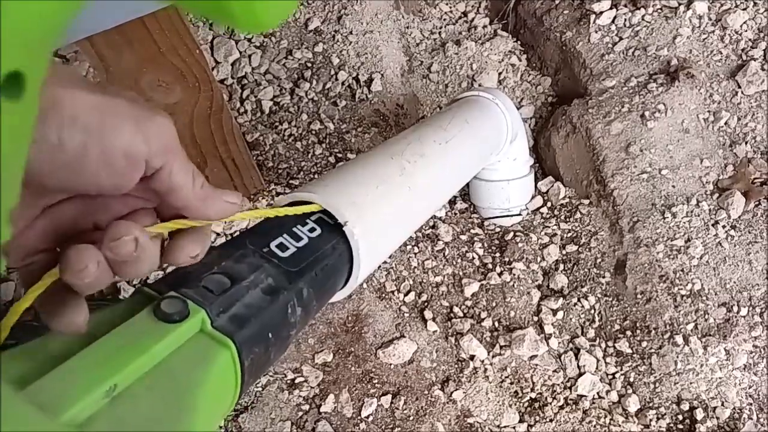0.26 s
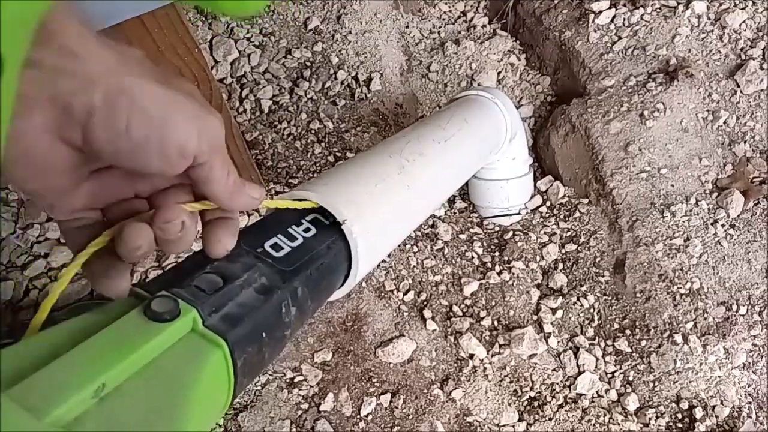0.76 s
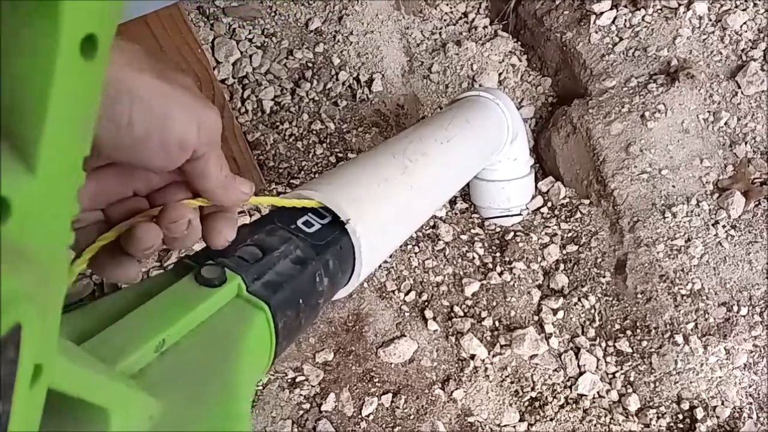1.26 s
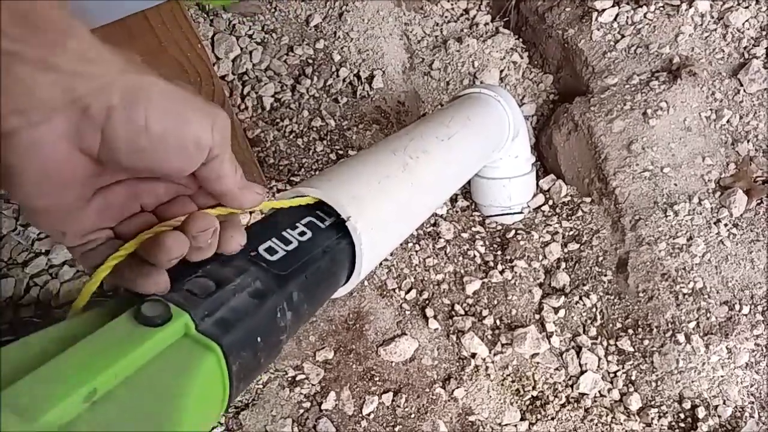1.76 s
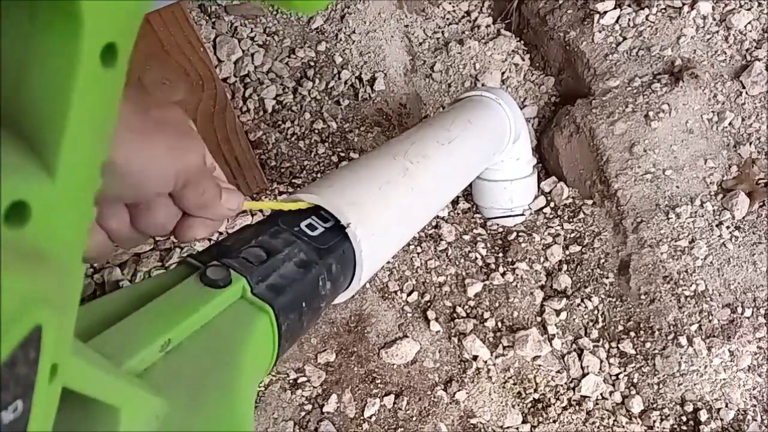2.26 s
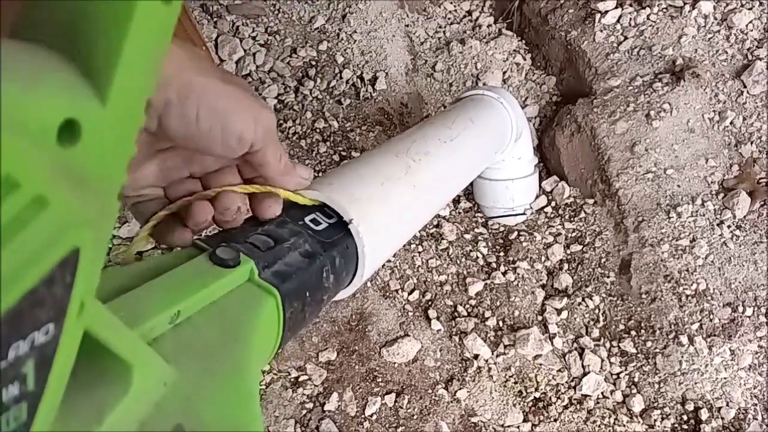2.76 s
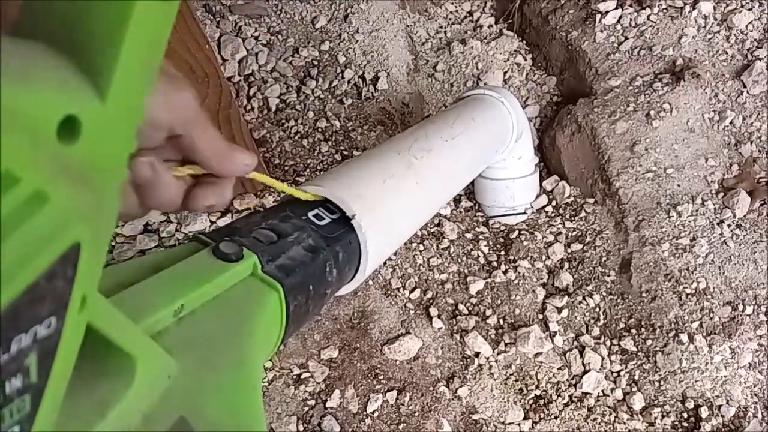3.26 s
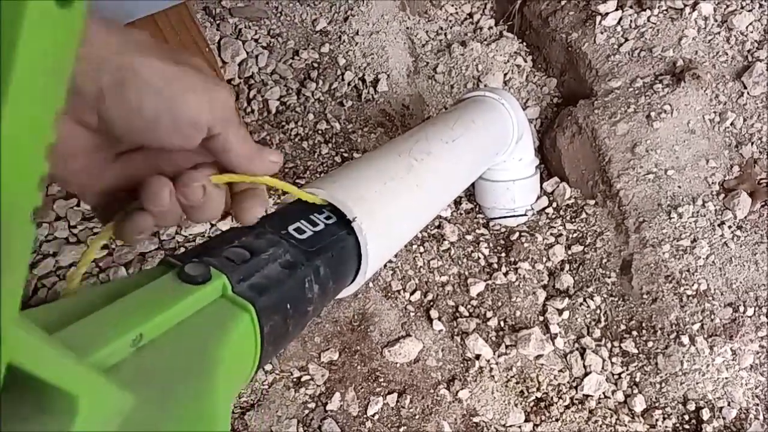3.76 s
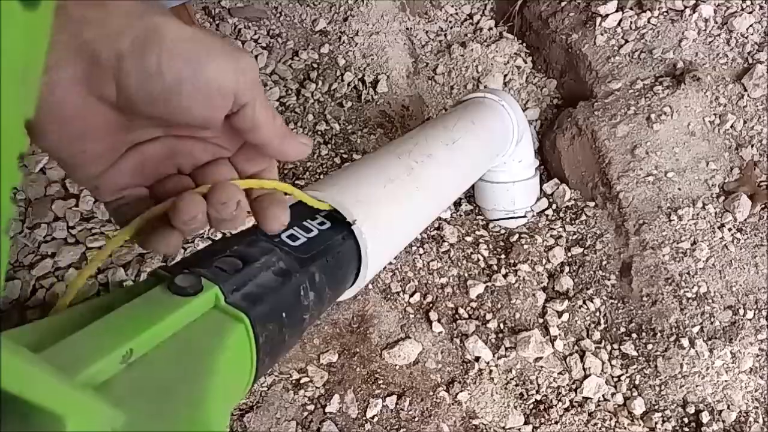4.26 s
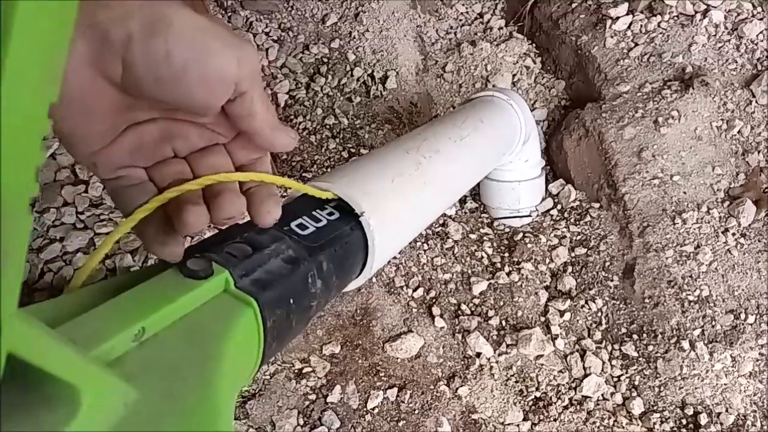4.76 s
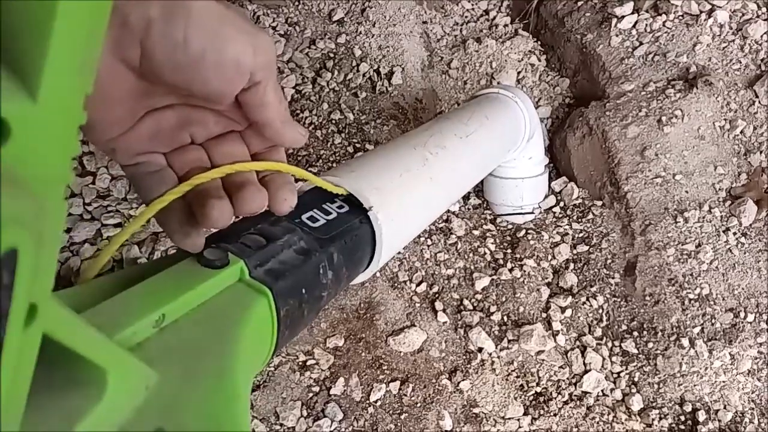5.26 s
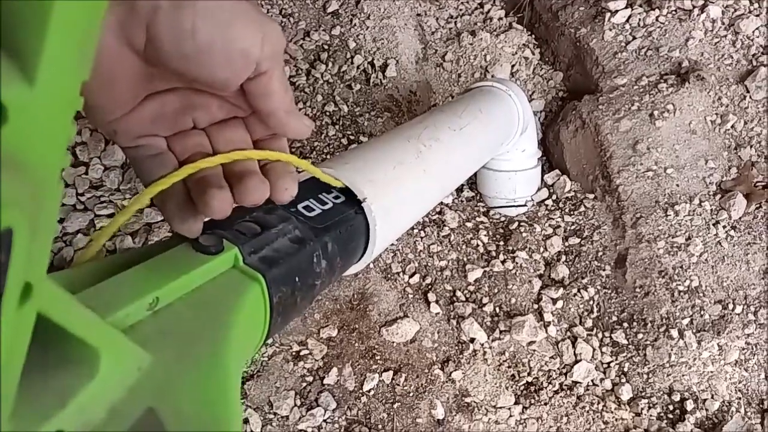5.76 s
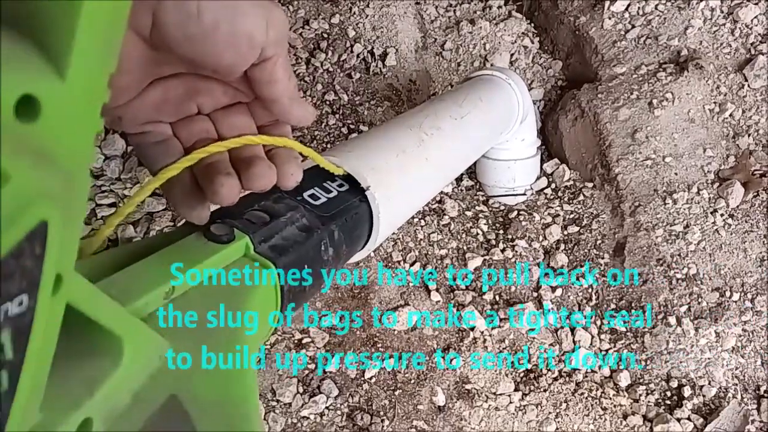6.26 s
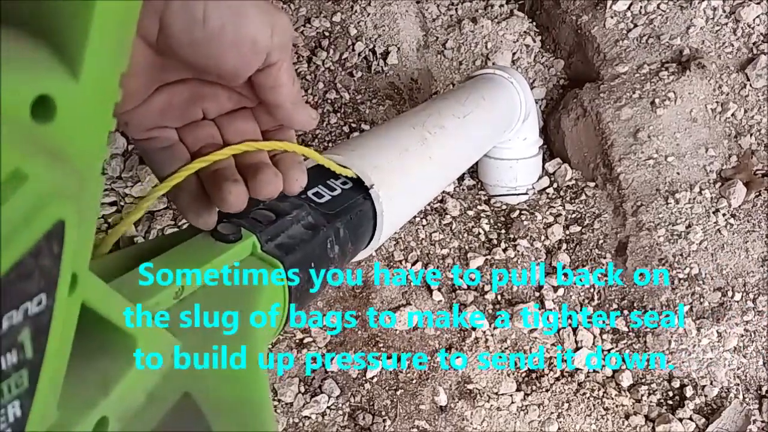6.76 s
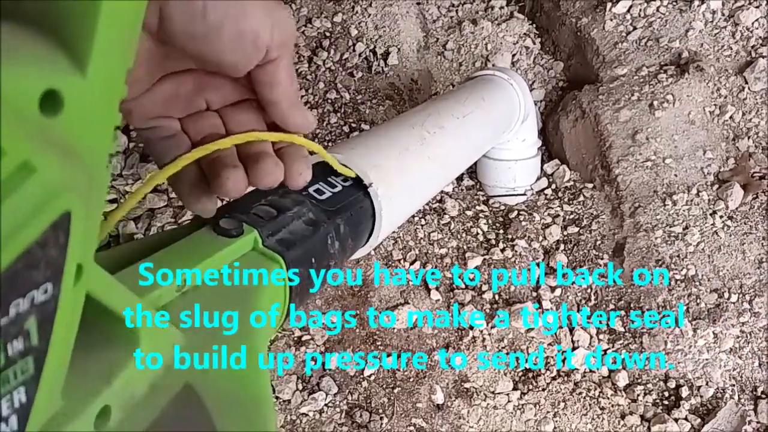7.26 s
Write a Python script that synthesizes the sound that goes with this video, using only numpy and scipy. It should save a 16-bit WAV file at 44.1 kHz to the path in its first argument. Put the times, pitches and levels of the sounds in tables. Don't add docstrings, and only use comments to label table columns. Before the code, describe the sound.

An electric leaf blower runs without pause, blowing into a white plastic pipe outdoors. Broad rushing hiss dominates, with a buzzy motor and fan whine beneath. The nozzle eases off twice early, changing the hiss; then the whine strengthens and chirps as pressure builds. After reseating, a lower airy whistle leaks around the seam, with soft hollow bumps. Very close small camera microphone, left side much louder and brighter.

```python
import sys
import numpy as np
from scipy import signal
from scipy.io import wavfile
from scipy.ndimage import uniform_filter1d

SR = 44100
rng = np.random.default_rng(int(sys.argv[2]) if len(sys.argv) > 2 else 0)


def linear_from_db(decibels):
    return 10 ** (np.asarray(decibels, float) / 20)


def generate_wav(sig):
    pcm = np.round(np.clip(np.atleast_2d(sig).T, -1, 1) * 32767).astype(np.int16)
    wavfile.write(sys.argv[1], SR, pcm)


N = 331089

# pitch_hz, left_db, right_db
HUM_LINES = [
    (121, -74.5, -84),
    (363.5, -84, -77),
    (610, -69, -76),
]
# freq_hz, density_db_per_hz (above -70)
RUSH_LEFT = [(25, -64.5), (90, -12.5), (160, -11), (350, -14), (800, -10.5), (1500, -9), (2050, -13),
             (2600, -6.5), (3450, -10.5), (4250, -12.5), (5800, -10), (9200, -15.5), (11500, -32),
             (15700, -40)]
# freq_hz, density_db_per_hz (above -70)
RUSH_RIGHT = [(25, -48), (110, -22.5), (350, -26.5), (700, -16), (1450, -16.5), (1750, -14), (2600, -11.5),
              (3100, -15), (3400, -41), (5300, -20), (6900, -30), (8000, -24.5), (11300, -42),
              (15700, -44.5)]
# centre_hz, width_hz, left_db, right_db
RESONANCES = [(245.3, 33, 9.5, 15.5), (613, 104, 3.5, -1.5), (1017, 59, 8.5, 1.5), (1345, 130, 7, 4),
              (1610, 60, 1, 4.5), (2310, 160, 0.5, -1.5), (2745, 134, 1, 1), (2910, 62, 3, 1.5),
              (3156, 205, 4.5, -6), (3675, 290, 4.5, 10), (4410, 90, 6.5, -6), (4580, 350, -1, -3),
              (6370, 170, 6, -13), (7287, 1480, 15.5, -15), (8900, 1310, 4.5, 10), (9330, 510, -5, -3.5)]
# freq_hz, likeness_0_1
PORT_LIKENESS = [(30, .25), (200, .92), (600, .84), (950, .68), (1300, .28), (1900, .25), (2650, .77),
                 (3150, .4), (3700, .65), (5300, .15), (5900, .3), (6600, .14), (15000, .07)]
# freq_hz, lag_rad
PORT_LAG = [(0, 0), (800, 3.1), (1100, 4.2), (1500, 7), (1900, 9), (2150, 6.3), (2900, 5.9), (3700, 8.1),
            (4400, 9.3), (5900, 10.1), (7000, 16), (9200, 21), (15000, 33)]
# centre_s, pitch_hz, level_db, length_s
EDGE_TONES = [(.05, 3050, -54, .12), (.3, 3080, -58, .1), (.3, 5420, -54, .08), (.52, 5120, -57, .12),
              (.66, 3060, -55, .08), (.8, 5400, -56, .1), (.92, 3110, -54.5, .16), (1.02, 4430, -56, .06),
              (1.25, 3640, -56, .06), (1.27, 3230, -54, .12), (1.7, 5010, -56, .12), (1.88, 5060, -62, .1),
              (2.5, 3190, -50, .12), (2.72, 3160, -49, .1), (2.8, 3230, -48.5, .08), (2.88, 4410, -51, .07),
              (3.03, 3230, -49.5, .12), (3.15, 4400, -48, .1), (3.3, 3080, -51, .1), (3.45, 3110, -58, .1),
              (3.97, 4420, -54, .08), (4.07, 1600, -57, .15), (4.5, 3700, -54, .1), (5.1, 2980, -53.5, .12),
              (5.22, 4410, -58.5, .1), (5.97, 4430, -54, .08), (6.3, 4430, -53.5, .14),
              (6.56, 4430, -53, .08), (7.12, 2450, -51.5, .08), (7.35, 4400, -57, .08)]
# time_s, speed_hz
ROTOR_SPEED = [(0, 241.1), (.3, 240.9), (1.0, 240.7), (1.3, 241.4), (1.55, 241.7), (1.8, 239.5),
               (2.05, 240.2), (2.45, 242.5), (3.4, 242.5), (3.8, 240.4), (4.65, 240.2), (5.45, 241.4),
               (6.0, 240.9), (6.5, 240.8), (7.5, 242.1)]
# multiple, left_over_rush_db, right_over_rush_db
ODD_ORDERS = [(2, 8.5, 4.5), (3, 5.5, 2), (10, 2, -3), (12, 0, 5), (13, -4, -6), (15, -1, -5), (30, 1, 0),
              (31, -4, -5), (32, 1, 1), (35, 2, 0), (36, 0, -1), (39, 5, 0), (41, 6, 4), (42, 7, 3),
              (49, 2, -1), (50, 2, 0), (59, 2, 0)]
# multiple, left_db, right_db, bared_vent_gain_db
LEADING_ORDERS = [(1, -61, -70.5, 1), (18, -62, -86, -2), (23, -63.5, -91, 11.5), (27, -58.5, -83, 0),
                  (29, -58.5, -90, 3), (44, -84, -101, 6), (48, -80.5, -96, 0)]
# centre_s, multiple, lift_db, length_s
ORDER_FLARES = [(.74, 18, 12, .1), (1.9, 18, 7, 0.14), (2.5, 18, 3, .1), (2.6, 18, 7, 0.085),
                (3.3, 18, 9, 0.089), (3.42, 18, 7, 0.076), (7.36, 18, 10, .1), (1.03, 23, 11, .08),
                (1.456, 23, 11, .1), (1.93, 23, 8, .06), (3.63, 23, 11, 0.16), (2.8, 27, 12, 0.97),
                (5, 27, 4, .5), (6.2, 27, 3, 0.67), (.75, 29, 12, 0.63), (1.5, 29, 4, .2),
                (.47, 44, 12, .15), (.87, 44, 10, .3), (1.49, 44, 24, 0.11), (2.27, 44, 17, .25),
                (3.55, 44, 6, .1), (1.15, 48, 9, .12), (1.7, 48, 19, 0.27), (6.82, 48, 6, .15)]
# centre_s, lift_db, length_s
HOUSING_SHAKES = [(.38, 14, 0.057), (.72, 10.5, 0.12), (.88, 11.5, 0.063), (1.08, 12.5, 0.056),
                  (1.45, 5, 0.22), (1.7, 4.5, 0.38), (1.98, 9.5, 0.082), (2.5, 15, 0.083),
                  (3.22, 1.5, 0.24), (3.55, 2, 0.12), (3.98, 14.5, 0.39), (4.55, 6, 0.11), (4.85, 6, 0.13),
                  (5.2, 7, 0.077), (5.43, 12.5, 0.26), (6.12, 10.5, 0.27), (6.42, 5.5, 0.089),
                  (6.72, 8.5, 0.34), (7.18, 11, 0.09), (7.48, 9.5, .15)]
# time_s, level_db
BACK_PRESSURE = [(0, -49.5), (.66, -57), (.83, -46.5), (1.0, -57), (1.5, -52.5), (1.68, -60), (2.05, -64),
                 (2.36, -48.5), (2.78, -43), (3.5, -41.5), (3.7, -57.5), (4.1, -59), (4.65, -60),
                 (5.55, -49), (5.8, -56.5), (6.2, -58), (7.0, -49.5), (7.51, -46.5)]
# start_s, end_s, opening_0_1
NOZZLE_LIFTS = [
    (-.2, 1.066, 0.7),
    (1.41, 1.98, 0.64),
    (3.5, 3.76, 0.35),
]
# centre_s, lift_db, length_s
SEAM_WHISTLES = [
    (1.68, 8.5, 0.34),
    (2.8, 3, .2),
    (3.6, 5, .3),
    (4.08, 9, 0.3),
    (4.7, 4.5, .5),
]
# centre_s, lift_db, length_s
BACK_DRAUGHTS = [(.13, 5.5, 0.24), (.55, 3.5, .15), (1.67, 9.5, 0.2), (2.27, 1, 0.05), (2.46, 4, 0.075),
                 (2.84, 6, .15), (3.12, 6, 0.11), (3.75, 3, .5), (4.3, 5, 0.19), (4.9, 5, 0.064),
                 (5.23, 9, 0.1), (5.46, 7.5, 0.16), (5.7, -2, .1), (5.9, 10.5, 0.049), (6.95, 0, 0.13),
                 (6.25, 3.5, 0.53), (7.4, 3.5, 0.46)]
# centre_s, ring_hz, lift_db
PIPE_RINGS = [(2.07, 560, 9), (2.95, 580, 10.5), (3.6, 440, 11), (3.84, 610, 11), (5.1, 690, 13),
              (5.33, 750, 14), (5.38, 1050, 7.5), (6.27, 486, 9), (7.18, 660, 10), (1.8, 1250, 16.5),
              (1.6, 1260, 12), (3.64, 1250, 9), (0.276, 1030, 12)]

RESEAT_S, PIPE_FILLS_S = 3.58, 2.7


def evened(x):
    return x / np.sqrt(np.mean(x ** 2) + 1e-20)


def read(points, hz):
    f, value = np.transpose(points)
    return np.interp(np.log(hz + 1), np.log(f + 1), value)


def bump(x, centre, width):
    return np.exp(-np.log(2) * (2 * (x - centre) / width) ** 2)


def swells(rows, t):
    return sum(db * bump(t, s, length_s) for s, db, length_s in rows)


def after(t, s, edge_s=.045):
    return .5 + .5 * np.tanh((t - s) / edge_s)


def wander(t, rate_hz, count, from_hz=.2):
    f = np.geomspace(from_hz, rate_hz, 16)
    phase = f[:, None] * t + rng.random((count, 16, 1))
    waves = np.sin(2 * np.pi * phase) / f[:, None] ** .25
    return waves.sum(1) / np.sqrt((.5 / np.sqrt(f)).sum())


def lag(hz):
    return np.interp(hz, *np.transpose(PORT_LAG))


def tone(spin, hz, gain):
    start = np.exp(1j * (2 * np.pi * rng.random() + np.array([[0], [lag(hz)]])))
    return np.sqrt(2) * gain * (start.real * spin.real - start.imag * spin.imag)


def vents(t):
    return sum(share * (after(t, start) - after(t, end)) for start, end, share in NOZZLE_LIFTS)


def density_db(hz):
    rings = sum(np.outer([left, right], bump(hz, f, w)) for f, w, left, right in RESONANCES)
    return np.array([read(RUSH_LEFT, hz), read(RUSH_RIGHT, hz)]) + rings - 70


def hum(waver_db=2.5):
    t = np.arange(N) / SR
    wavers = np.repeat(linear_from_db(waver_db * wander(t[::64], 4.9, count=3)), 64, axis=1)[:, :N]
    out = np.zeros((2, N))
    for (hz, left_db, right_db), waver in zip(HUM_LINES, wavers):
        spin = np.exp(2j * np.pi * hz * t)
        out += tone(spin, hz, linear_from_db(np.array([[left_db], [right_db]])) * waver)
    return out


def edge_tones(waver=.006, flutter_db=4.5, lift_db=4, right_db=-32):
    out = np.zeros((2, N))
    for s, hz, db, length_s in EDGE_TONES:
        first = max(round((s - 1.5 * length_s) * SR), 0)
        last = min(round((s + 1.5 * length_s) * SR), N)
        at = np.arange(first, last)
        pitch, flutter = wander(at / SR, 40, count=2, from_hz=4)
        spin = np.exp(2j * np.pi * np.cumsum(hz * (1 + waver * pitch)) / SR)
        level_db = db + lift_db + flutter_db * flutter + [[0], [right_db]]
        out[:, at] += tone(spin, hz, linear_from_db(level_db) * bump(at / SR, s, length_s))
    return out


def leading_db(t, right_db=-54, reseat_db=-8, right_share=.2):
    blades = np.interp(t, *np.transpose(BACK_PRESSURE))
    blades_right = right_db + reseat_db * after(t, RESEAT_S) + right_share * (blades + 55)
    led = {9: np.array([blades, blades_right])}
    for k, left, right, bared_db in LEADING_ORDERS:
        rows = [(s, db, length_s) for s, multiple, db, length_s in ORDER_FLARES
                if round(multiple) == round(k)]
        if round(k) == 1:
            rows = HOUSING_SHAKES
        led[round(k)] = np.array([[left], [right]]) + bared_db * vents(t) + swells(rows, t)
    return led


def rotor(common_db=-3, line_db=7, flutter_db=3.5, jitter=.0004):
    t, slow = np.arange(N) / SR, np.arange(0, N / SR + .02, .01)
    speed_hz = np.interp(slow, *np.transpose(ROTOR_SPEED))
    speed_hz = speed_hz * (1 + jitter * wander(slow, 39.9, count=1)[0])
    once = np.exp(2j * np.pi * np.cumsum(np.interp(t, slow, speed_hz)) / SR)

    over = {k: np.array([common_db, common_db]) for k in range(1, 64)}
    over.update({int(k): np.array([left, right]) for k, left, right in ODD_ORDERS})
    led = leading_db(slow)
    waver = 4 * np.tanh(wander(slow, 6, count=64, from_hz=.4))
    flutter = flutter_db * wander(slow, 30, count=64, from_hz=5)
    flutter[[1, 9, 18, 23]] *= [[.9], [.55], [1.4], [1.3]]
    waver[[2, 3]] *= .3
    flutter[[2, 3]] *= .4

    spin, out = 1, np.zeros((2, N))
    for k in range(1, 64):
        hz = k * speed_hz.mean()
        spin = spin * once
        if k in led:
            db = led[k]
        else:
            level_db = density_db(np.array([hz]))[:, 0] + over[k] + line_db
            db = level_db[:, None] + waver[k]
        gain = linear_from_db(db + flutter[k])
        out += tone(spin, hz, np.array([np.interp(t, slow, port) for port in gain]))
    return out


def pose_db(t, hz, flutter_db=2.5):
    pressure_db = np.interp(t, *np.transpose(BACK_PRESSURE)) + 55
    seam_db = swells(SEAM_WHISTLES, t) - 1.2
    seated, filled, bared = after(t, RESEAT_S), after(t, PIPE_FILLS_S), vents(t)
    jet_db = -0.52 * (t - 3.7)
    gap_db = 9 * bared - 0.2
    housing_db = 0.29 * np.maximum(pressure_db - 3, -6) * (1 - 0.24 * seated)
    slit_db = filled + 3.2 * seated * (1 + 0.76 * wander(t, 25, count=1, from_hz=6)[0])
    regions = [
        (jet_db, bump(hz, 7500, 1800)),
        (gap_db, bump(hz, 5100, 790) + 0.7 * bump(hz, 10800, 2200)),
        (-3 * bared, bump(hz, 2930, 130)),
        (housing_db, 1.76 * bump(hz, 3180, 360)),
        (5 * filled - 2.5, bump(hz, 1315, 130)),
        (slit_db, bump(hz, 4320, 100)),
        (seam_db * (t < 3), 1.8 * bump(hz, 1730, 100)),
        (seam_db * (t >= 3), 1.6 * bump(hz, 1650, 71)),
        (swells(BACK_DRAUGHTS, t) - 3.1, 1.3 * bump(hz, 73, 380))]
    for s, ring_hz, db in PIPE_RINGS:
        regions.append((db * bump(t, s, 0.063), bump(hz, ring_hz, 154)))
    narrow = RESONANCES[:-4]
    for ring, eddy in zip(narrow, wander(t, 25, count=len(narrow), from_hz=3)):
        regions.append((flutter_db * eddy, bump(hz, ring[0], 0.96 * ring[1])))
    return sum(np.outer(shape, db) for db, shape in regions)


def rush(patchy_db=1.3, drift_db=1.1, flicker_db=.3):
    hz, t, (a, b) = signal.stft(rng.standard_normal((2, N)), SR, nperseg=1024, noverlap=768)
    patches, drift = rng.standard_normal((2,) + a.shape)
    patches = evened(uniform_filter1d(uniform_filter1d(patches, size=10, axis=0), size=12, axis=1))
    drift = evened(uniform_filter1d(uniform_filter1d(drift, size=2, axis=0), size=40, axis=1))
    same = np.clip(read(PORT_LIKENESS, hz), 0, 1)[:, None]
    right = (same * a + np.sqrt(1 - same ** 2) * b) * np.exp(1j * lag(hz))[:, None]
    field_db = pose_db(t, hz) + patchy_db * patches + drift_db * drift
    field_db = field_db + flicker_db * wander(t, 30, count=1)
    port_share = np.array([1, .6])[:, None, None]
    colour = linear_from_db(density_db(hz)[:, :, None] + field_db * port_share) * np.sqrt(SR / 2)
    return signal.istft(np.array([a, right]) * colour, SR, nperseg=1024, noverlap=768)[1][:, :N]


def scene():
    return hum() + edge_tones() + rotor() + rush()


def roll_off(x):
    return signal.sosfilt(signal.butter(12, 15710, fs=SR, output="sos"), x)


def record(dry, knee_db=-36.5, squeeze=0.29, roof=0.06):
    power_db = 10 * np.log10(uniform_filter1d(dry[0] ** 2, size=500) + 1e-12)
    even = dry / linear_from_db(squeeze * (power_db - knee_db))
    return roll_off(roof * np.tanh(even / roof))


dry = scene()
out = record(dry)
generate_wav(out)
```